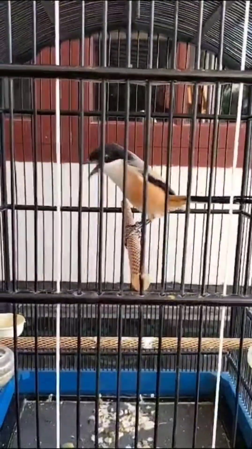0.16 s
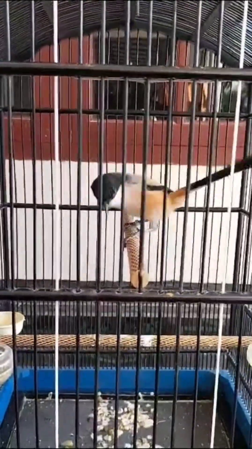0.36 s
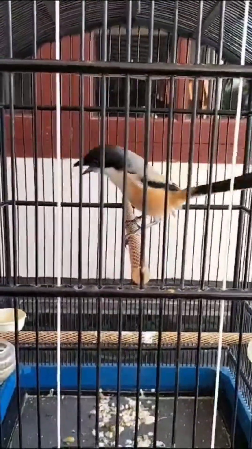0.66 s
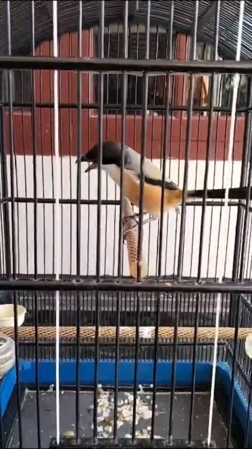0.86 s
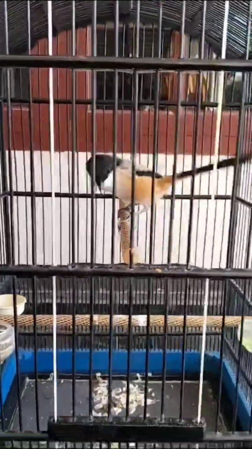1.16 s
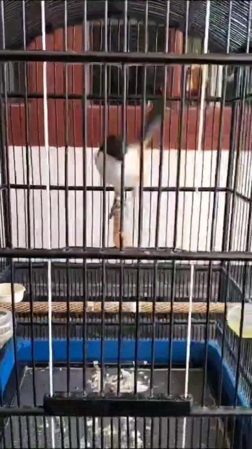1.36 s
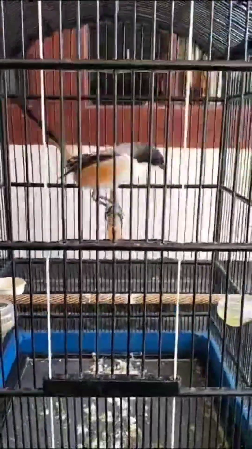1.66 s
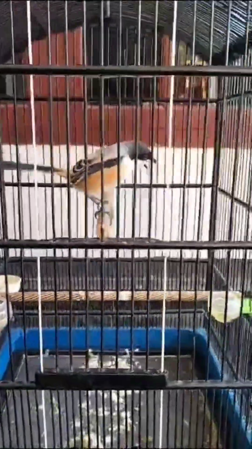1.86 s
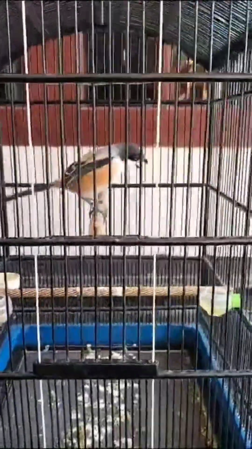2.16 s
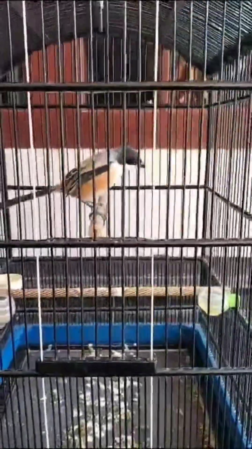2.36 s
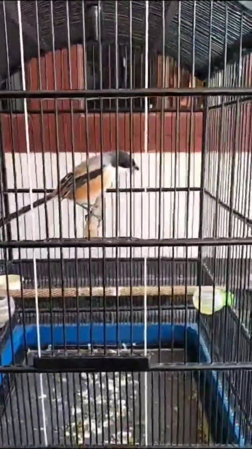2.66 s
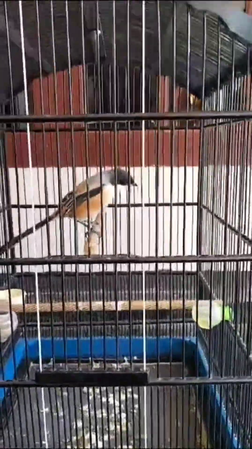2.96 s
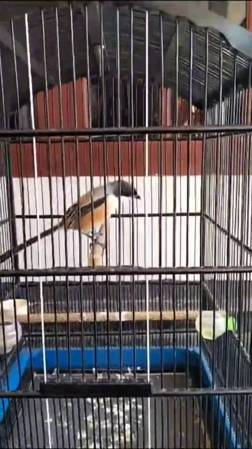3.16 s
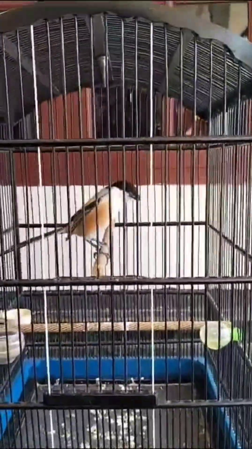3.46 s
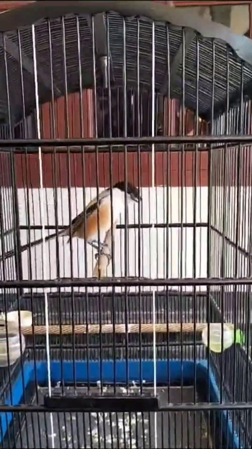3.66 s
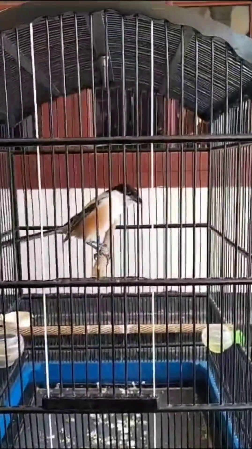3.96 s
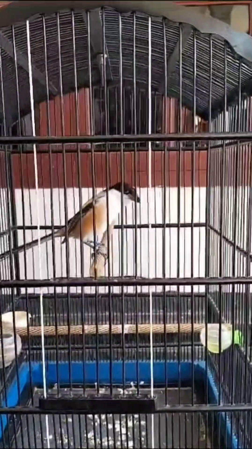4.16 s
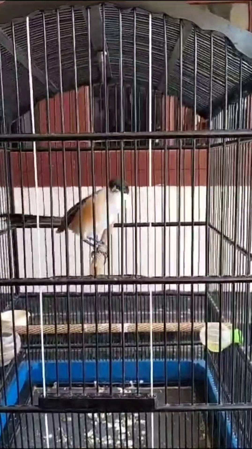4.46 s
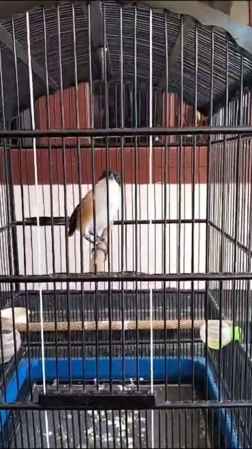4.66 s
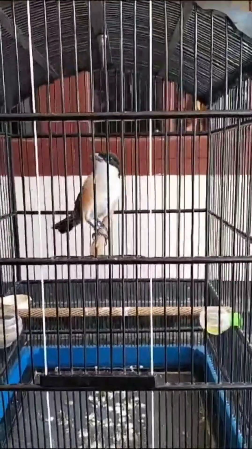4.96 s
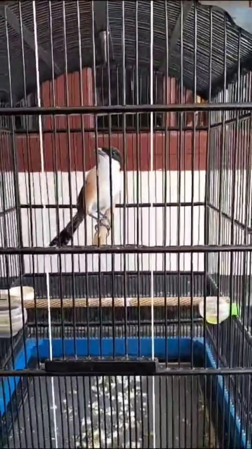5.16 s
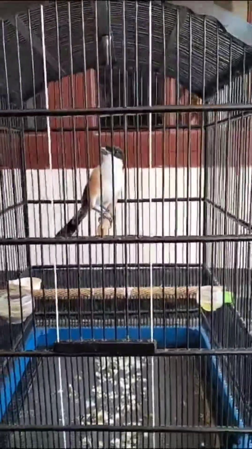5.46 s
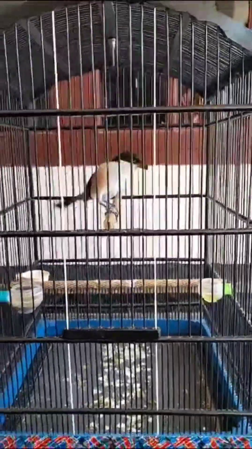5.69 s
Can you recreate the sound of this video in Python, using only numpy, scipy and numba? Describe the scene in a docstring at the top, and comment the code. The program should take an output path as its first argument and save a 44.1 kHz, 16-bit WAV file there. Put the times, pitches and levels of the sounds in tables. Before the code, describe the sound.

Piercing birdsong moves from down-sweeping whistles through hoarse little trills to speeding chip pairs, with faint other birds and wind puffs on the microphone.

```python
"""A caged songbird sings close to a phone under a hard-walled porch: harmonic sums glide down in two-toned
whistles with treble splatter, step through trills of short pips, then sweep through quick paired chips.
Decaying noise echoes it off cage and walls; other birds whistle and churr with smeared harmonics, heard directly
and with relatively more echo; shaped noise makes the wind puffs on the microphone and the outdoor murmur.
The phone's gain control ducks on each loud note and recovers slowly; the loudest peaks clip."""
import sys
import numpy as np
from scipy import signal
from scipy.fft import rfft, irfft, next_fast_len
from scipy.io import wavfile
from scipy.ndimage import uniform_filter1d, minimum_filter1d, map_coordinates
from numba import njit

SR = 44100
rng = np.random.default_rng(int(sys.argv[2]) if len(sys.argv) > 2 else 0)


def level_to_linear(level):
    """Convert decibel levels to linear amplitude factors, elementwise."""
    exponent = np.asarray(level, float) / 20
    return 10 ** exponent


def int16_out(signal):
    """Quantize to a 16-bit WAV file."""
    q = np.round(np.clip(np.atleast_2d(signal).T, -1, 1) * 32767)
    wavfile.write(sys.argv[1], SR, q.astype(np.int16))


N = 257103
LEAD = SR // 5  # samples sung before time zero


def unit(x):
    """Normalization: scales a signal to rms 1."""
    return x / np.sqrt(np.mean(x ** 2) + 1e-20)


def along(points, hz):
    """Logarithmic frequency scale: reads (hz, value) points between their frequencies."""
    point_hz, value = np.transpose(points)
    return np.interp(np.log(hz + 1), np.log(point_hz + 1), value)


def wobble(rate, n=N):
    """Band-limited random modulation: a smooth curve through `rate` random knots a second."""
    return map_coordinates(rng.standard_normal(n // 20 + 4), [np.arange(n) * rate / SR])


def coloured(spectrum, size=N):
    """Spectral shaping: white noise filtered to the given spectrum, at rms 1."""
    m = next_fast_len(size)
    gain = level_to_linear(along(spectrum, np.fft.rfftfreq(m, 1 / SR)))
    return unit(irfft(rfft(rng.standard_normal(m)) * gain, m)[:size])


def add(track, start_s, sound):
    """Superposition: adds a sound to the track at its start time."""
    part = track[LEAD + round(start_s * SR):][:len(sound)]
    part += sound[:len(part)]


# resonance of beak and throat: frequency_hz, gain_db
BEAK_GAIN = [(1500, -52), (2300, -14.5), (3500, 8.5), (5000, 5.5), (7600, 6), (8600, -2.5), (10500, -10.5),
             (15000, 4.5)]


def partials(hz, levels_db, rough):
    """Source and filter: harmonics weighted by the beak; uneven airflow smears the high ones most."""
    phase = 2 * np.pi * (np.cumsum(hz) / SR + rng.random())
    out = 0
    for k, db in enumerate(levels_db, 1):
        smear = rough * k ** 1.692 * wobble(600, len(hz))  # radians
        gain = level_to_linear(db + along(BEAK_GAIN, k * hz) + 2.09 * smear)
        audible = k * hz < SR / 2  # no partial may alias
        out = out + gain * audible * np.sin(k * phase + smear)
    return out


# shape of one falling whistle, before its stretch and bend: time_ms, pitch_hz, fundamental_db, octave_db
WHISTLE_SHAPE = [(0, 7800, -26, -27), (8, 6900, -17, -27), (12, 5900, -3, -42), (21, 4500, -9, -40),
                 (26, 3980, -5, -10), (42, 3700, -10, -3.5), (62, 3400, -14, -1.5), (85, 3140, -19, -5),
                 (98, 3090, -23, -36)]
# falling whistles: start_s, level_db, end pitch factor (ratio), slow part's length factor (ratio),
# change of the fundamental at the end_db
WHISTLE_NOTES = [(-.09, 2.5, 0.99, 0.8, 0), (0.275, 2, 1.0, 1.05, 17), (0.572, 3, 1, 0.8, -3),
                 (0.7908, 1, 1.01, .8, -4), (0.9735, 0, 1.02, 0.9, -3), (1.164, 1.5, 0.955, 0.9, 2)]
# treble splatter of overload above the whistle: frequency_hz, relative density_db
SPLATTER_SPECTRUM = [(7000, -45), (8500, 0.5), (10500, -2), (14000, -3)]


def whistles():
    """Frequency glide: a fast drop slows down while the octave takes over, under treble overload splatter."""
    knee_ms = 26  # where the fast drop turns into the slow part
    out = np.zeros(N + LEAD)
    ms, hz, first_db, octave_db = np.transpose(WHISTLE_SHAPE)
    for start_s, db, factor, stretch, end_db in WHISTLE_NOTES:
        when = np.where(ms > knee_ms, knee_ms + stretch * (ms - knee_ms), ms)
        t = np.arange(round(when[-1] * SR / 1e3)) / SR * 1e3  # ms
        u = t / when[-1]  # share of the note
        first = np.interp(t, when, first_db) + end_db * u ** 5
        octave = np.interp(t, when, octave_db)
        pitch = np.interp(t, when, hz) * factor ** u
        levels = [first, octave, octave - 18 - 20 * u, octave - 28]
        tone = partials(pitch, levels, rough=.1)
        splatter = level_to_linear(-34 + 3.7 * wobble(250, len(t))) * coloured(SPLATTER_SPECTRUM, size=len(t))
        splatter = splatter * np.clip(t / knee_ms, 0, 1) ** 2
        flutter = level_to_linear(db + 1.88 * wobble(126.0, len(t))) * signal.windows.tukey(len(t), .1)
        add(out, start_s, flutter * (tone + splatter))
    return out


# typical decay of the porch, scattered from pitch to pitch: frequency_hz, t60_s
PORCH_DECAY = [(2500, 0.45), (6000, 0.32), (14000, 0.28)]


def porch(x):
    """Reverberation: strong early echoes from cage and wall, then a tail in which some pitches ring on.

    The random tail is redrawn every 0.1 s, cross-faded.
    """
    step = SR // 10
    fade = np.hanning(2 * step + 1)[:-1]
    out = np.zeros(len(x) + SR + 3 * step)
    x = np.pad(x, (step, 2 * step))
    for start in range(0, len(x) - 2 * step, step):
        hz, t, z = signal.stft(rng.standard_normal(SR // 2), SR, nperseg=512)
        t60 = along(PORCH_DECAY, hz) * np.exp(.15 * rng.standard_normal(len(hz)))
        tail = signal.istft(z * level_to_linear(-60 * t / t60[:, None]), SR, nperseg=512)[1]
        age = np.arange(len(tail)) / SR
        early = (age > .002) * (1 + 2.02 * np.exp(-age / 0.0053))
        tail = tail * early * level_to_linear(1.26 * wobble(145.4, len(tail)))
        wet = signal.fftconvolve(x[start:start + 2 * step] * fade, tail / np.linalg.norm(tail))
        out[start:start + len(wet)] += wet
    return out[step:len(x) - 2 * step]


# wind on the microphone: time_s, level_db
WIND_LEVEL = [(0, -51), (.07, -35), (.25, -22), (.39, -31.5), (.47, -28), (.9, -26.5), (.95, -15.5),
              (1.08, -39.5), (1.35, -27.5), (1.6, -44), (1.8, -24), (1.92, -25), (1.97, -42), (2.69, -31),
              (2.77, -41), (3.5, -37.5), (3.56, -56), (3.85, -53), (3.891, -14.5), (3.929, -49), (4.0, -17),
              (4.12, -52)]
# outdoor murmur: frequency_hz, relative density_db
MURMUR_SPECTRUM = [(90, -10), (170, -3.5), (420, -16), (2000, -20), (8000, -29), (10000, -85.5)]
# wind rumble: frequency_hz, relative density_db
RUMBLE_SPECTRUM = [(25, -16), (60, 1.5), (125, 4.5), (260, -13), (600, -62.5)]


def wind():
    """Turbulence noise: low rumble in short puffs over a steady outdoor murmur."""
    time_s, db = np.transpose(WIND_LEVEL)
    puffs = unit(level_to_linear(4 * wobble(30)) * coloured(RUMBLE_SPECTRUM))
    murmur = level_to_linear(-41.5 + 1.2 * wobble(8)) * coloured(MURMUR_SPECTRUM)
    return level_to_linear(np.interp(np.arange(N) / SR, time_s, db)) * puffs + murmur


# distant whistles, before the beak's gain: start_s, length_s, start_hz, end_hz, level_db
DISTANT_WHISTLES = [(.685, 0.063, 2680, 2560, -22), (.7, 0.067, 2350, 2220, -24),
                    (.94, 0.063, 2680, 2664, -21), (1.02, 0.076, 2485, 2440, -22),
                    (2.28, 0.53, 2827, 2704, -42), (2.92, 0.75, 2726, 2470, -37),
                    (1.35, .8, 3626, 3702, -47), (5.3, 0.55, 2650, 2720, -39.5)]


def distant_birds():
    """Amplitude and frequency modulation: single-partial glides with soft ends and an unsteady level."""
    out = np.zeros(N + LEAD)
    for start_s, length_s, start_hz, end_hz, db in DISTANT_WHISTLES:
        u = np.linspace(0, 1, round(length_s * SR))
        pitch = (start_hz + (end_hz - start_hz) * u) * (1 + 0.006 * wobble(65.3, len(u)))
        swell = level_to_linear(db + 4.7 * wobble(60.1, len(u))) * np.sin(np.pi * u) ** .5
        add(out, start_s, swell * partials(pitch, [0], rough=.45))
    return out


def pip(start_hz, end_hz, nominal_ms, levels_db, rough, hiss_db, flick_db, stepped=False):
    """Two-sided syrinx: a short hissing note steps or glides, and the other side adds an upward flick.

    Overtones grow as it settles. A glide starts half its sweep before start_hz and overshoots end_hz.
    """
    u = np.linspace(0, 1, round(nominal_ms * SR / 1e3 * 1.2))  # lasts 1.2 times its nominal length
    if stepped:
        bend = .5 + .5 * np.tanh((u - .42) / .1)
        attack, release = .9 / nominal_ms, .45  # shares of the note
    else:
        bend = 1.635 * (1 - (1 - u) ** 2) - .5
        attack, release = 1.1 / nominal_ms, .38
    pitch = start_hz + (end_hz - start_hz) * bend
    shape = np.clip(u / attack, 0, 1) ** 2 * np.clip((1 - u) / release, 0, 1) ** 1.96
    hiss = level_to_linear(hiss_db - 10 * u) * coloured(BEAK_GAIN, size=len(u))
    flick = partials(pitch * (1 + .5 * u ** 4), [0], 3 * rough)
    flick = level_to_linear(flick_db) * np.sin(np.pi * u ** 4) ** 2 * flick
    unsettled_db = 20 * np.clip(.5 - u, 0, 1)
    levels_db = [db - unsettled_db * (k > 0) for k, db in enumerate(levels_db)]
    return shape * (partials(pitch, levels_db, rough) + hiss) + flick


TRILL_NOTES = [(1.383, 13.5, 5180, 4770, -12.5, -12.5), (1.6701, 14, 4545, 5400, -14, -15.5),
               (1.945, 13.2, 4900, 5020, -17.5, -20), (2.2446, 14.3, 4450, 4900, -14, None),
               (2.524, 13.7, 4430, 4526, -12.5, -27), (2.8, 13.8, 4440, 4740, -13, -23),
               (3.0774, 15, 4115, 4840, -11.5, -26.5), (3.486, 13.5, 3820, 4145, -8, None)]
# high notes that end the trills: start_s, start_hz, end_hz, level_db
TRILL_ENDINGS = [(1.4254, 5350, 5850, 1.5), (1.441, 6200, 7100, -5.5), (1.7138, 6240, 6850, 0),
                 (1.9883, 5880, 6450, 0), (2.288, 6000, 6120, 5), (2.568, 5260, 6200, 6),
                 (2.8434, 5510, 6250, 6.5), (3.129, 6240, 5630, 4), (3.5278, 4850, 6160, 6)]


def trills():
    """Stepped pitch: hoarse pips swell toward the third; the ending notes step and last longer."""
    climb, swell, third_db = 0.31, 0.57, -5  # middle pip's shares of the way to the third; third's level
    lead_in_ms, lead_in_ratio = 11, 1.13  # time before the first pip; pitch over it
    hoarse = .14
    out, pips = np.zeros(N + LEAD), []
    for start_s, gap_ms, first_hz, third_hz, first_db, lead_in_db in TRILL_NOTES:
        gap_s = gap_ms / 1e3
        middle_hz = first_hz + climb * (third_hz - first_hz)
        middle_db = first_db + swell * (third_db - first_db)
        pips += [(start_s, first_hz, first_db),
                 (start_s + gap_s, middle_hz, middle_db),
                 (start_s + 2 * gap_s, third_hz, third_db)]
        if lead_in_db is not None:
            pips.append((start_s - lead_in_ms / 1e3, first_hz * lead_in_ratio, lead_in_db))
    for start_s, hz, db in pips:
        rise = 0.061 if hz > 5150 else 0.03  # share of the pitch stepped up on either side of it
        note = pip(hz * (1 - rise), hz * (1 + rise), 6.1, [0, -10, -19], hoarse,
                   hiss_db=-8.5, flick_db=-19, stepped=True)
        add(out, start_s, level_to_linear(db) * note)
    for start_s, start_hz, end_hz, db in TRILL_ENDINGS:
        note = pip(start_hz, end_hz, 6.84, [0, -24, -19], hoarse,
                   hiss_db=-18.5, flick_db=-19, stepped=True)
        add(out, start_s, level_to_linear(db) * note)
    return out


# neighbouring bird's harsh churrs: start_s, length_s, start_hz, end_hz, level_db
CHURR_NOTES = [(2.183, 0.055, 1140, 1190, -44), (3.688, 0.06, 930, 1010, -41)]
# partials 1-7 of a churr, before the crack's changes and the beak's gain: level_db
CHURR_LEVELS = [-48, 20, 5, 5, 2, 4, -6]


def neighbour():
    """Period doubling: a nasal note cracks, halfway pitches break in, partial 2 sinks, the level stutters."""
    crack_at, crack_db, rough = 0.31, 12.5, 0.12  # share of the note, change of partials, hoarseness
    out = np.zeros(N + LEAD)
    for start_s, length_s, start_hz, end_hz, db in CHURR_NOTES:
        u = np.linspace(0, 1, round(length_s * SR))
        pitch = (start_hz + (end_hz - start_hz) * u ** 2) * (1 + 0.004 * wobble(120, len(u)))
        crack = np.clip((u - crack_at) / 0.071, 0, 1)
        levels = []
        for k, partial_db in enumerate(CHURR_LEVELS, 1):
            odd_cut = crack_db * (1 - crack) * (k % 2)  # odd partials wait for the crack
            second_cut = crack_db * crack * (k == 2)
            levels.append(partial_db - odd_cut - second_cut)
        stutter = level_to_linear(db + 5 * wobble(160, len(u))) * signal.windows.tukey(len(u), .3)
        add(out, start_s, stutter * partials(pitch, levels, rough * (.5 + crack)))
    return out


# paired chips: start_s, gap_ms, first_hz, second_hz, level_db
CHIP_PAIRS = [(3.807, 22.2, 3974, 3610, -2), (3.98, 20.2, 3800, 3337, -3.5), (4.142, 18, 3675, 3590, -1),
              (4.36, 17.7, 3810, 3910, 2), (4.534, 14.7, 3790, 3873, 7), (4.6912, 14.7, 3900, 3985, 4),
              (4.8421, 12.5, 3992, 4026, 3.5), (5.0039, 11.7, 4200, 3978, 2), (5.172, 12, 4092, 4124, 3.5),
              (5.3288, 14, 4320, 4170, 5.5), (5.4586, 13, 4440, 4307, 0), (5.5987, 14, 4616, 4450, 5.5),
              (5.736, 13.4, 4640, 4560, 4)]
# short grace chips before a pair: start_s, pitch_hz, upward sweep_hz, level_db
GRACE_CHIPS = [(3.793, 3750, -300, -16.5), (4.822, 5100, 495.5, -15), (5.152, 3680, -100, -7),
               (5.3111, 4045, 311.5, -4), (5.443, 4180, 916, -10)]
# third chips after a pair, and one echo (at 4.754 s): start_s, pitch_hz, level_db
THIRD_CHIPS = [(5.033, 4014, -2), (5.362, 3770, -4), (5.4853, 4310, 7), (4.754, 3954, -4.5),
               (5.623, 3990, -7), (5.763, 4150, 6)]
# short falling tails after chips: start_s, nominal start_hz, level_db
FALLING_TAILS = [(4.576, 2630, -6.5), (4.725, 3670, -8), (5.202, 4070, -15.5)]


def chips():
    """Sum tones: paired sweeps whose octave grows with effort; under each second chip the other side of
    the syrinx hums low, and the two pitches add up to a high tone."""
    level_hz, first_sweep, second_sweep = 4293, 1, 0.51  # a level chip's pitch; sweep per Hz above it
    grace_ms, first_ms, second_ms, third_ms, tail_ms = 4, 6.5, 8, 5.7, 11  # nominal lengths
    hum_hz, sum_top_hz = 2470, 6360  # the high tone climbs no further
    first_brighter_db = 6.5  # for the octave of first and grace chips; twice that for their flick
    tail_fall = 0.834  # nominal end pitch over start pitch

    # notes: start_s, pitch_hz, sweep_hz, level_db, nominal length_ms, bright_db
    notes = [(s, hz, sweep, db, grace_ms, first_brighter_db) for s, hz, sweep, db in GRACE_CHIPS]
    notes += [(s, hz, -110, db, third_ms, 0) for s, hz, db in THIRD_CHIPS]
    notes += [(s, hz * (1 + tail_fall) / 2, hz * (tail_fall - 1), db, tail_ms, 0)
              for s, hz, db in FALLING_TAILS]
    for start_s, gap_ms, first_hz, second_hz, db in CHIP_PAIRS:
        second_s = start_s + gap_ms / 1e3
        above = second_hz - level_hz  # low chips sweep down, high ones up
        shorter_ms = 5 * above / 1e3
        hum_db = -23 - 11.5 * above / 1e3  # fades under high chips
        sum_hz = min(hum_hz + second_hz, sum_top_hz)
        notes += [(start_s, first_hz, first_sweep * (first_hz - level_hz), db, first_ms, first_brighter_db),
                  (second_s, second_hz, second_sweep * above, db, second_ms - shorter_ms, 0),
                  (second_s, hum_hz, 0, db + hum_db, second_ms, 0),
                  (second_s, sum_hz, 0, db - 30, second_ms, 0)]

    out = np.zeros(N + LEAD)
    for start_s, hz, sweep, db, ms, bright_db in notes:
        levels = [0, -26 + bright_db + db / 2, -33, -33]
        # higher chips flick harder
        flick_db = min(-19.5 + 4.5 * (hz - level_hz) / 1e3 + 2 * bright_db, -3)
        note = pip(hz - sweep / 2, hz + sweep / 2, ms, levels, rough=.06, hiss_db=-23, flick_db=flick_db)
        add(out, start_s, level_to_linear(db) * note)
    return out


def scene():
    """Direct and reverberant sound: other birds carry relatively more echo than the near song; wind has none."""
    song = whistles() + trills() + chips()
    far = distant_birds() + neighbour()
    echoes = porch(level_to_linear(-3.0) * song + far)
    birds = (song + far + echoes)[LEAD:]
    return (birds + wind())[None]


@njit
def follow(level, floor, attack, release):
    """Envelope detection: a one-pole follower that rises fast and sinks slowly, never below the floor."""
    out, now = np.empty_like(level), floor
    for i in range(len(level)):
        goal = max(level[i], floor)
        now += (goal - now) * (attack if goal > now else release)
        out[i] = now
    return out


def top_cut(x):
    """Nothing passes above the cut-off."""
    return signal.sosfilt(signal.butter(12, 15970, fs=SR, output="sos"), x)


def record(dry):
    """Dynamic compression: gain ducks on loud notes, a fast limiter eases their starts, the rest clips."""
    knee = level_to_linear(-5.0)
    attack_s, release_s = 0.00073, .09
    level = follow(np.abs(dry[0]), knee, 1 / (attack_s * SR), 1 / (release_s * SR))
    x = dry * (knee / level) ** 0.78
    span = SR // 1500  # samples the limiter looks across
    needed = 1 / np.maximum(np.abs(x) / 1.13, 1)
    x = x * uniform_filter1d(minimum_filter1d(needed, span), span)
    clipped = np.clip(x, -1.05, 1.05)
    lowpass = signal.butter(12, 16000, fs=SR, output="sos")
    return top_cut(signal.sosfiltfilt(lowpass, clipped))


dry = scene()
out = record(dry)
int16_out(out)
```